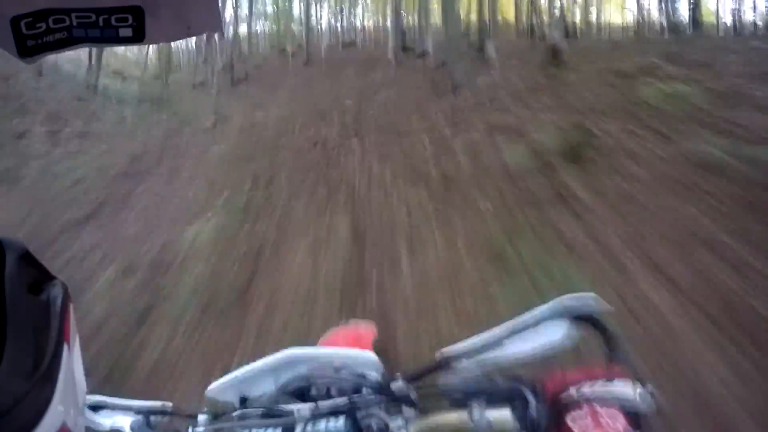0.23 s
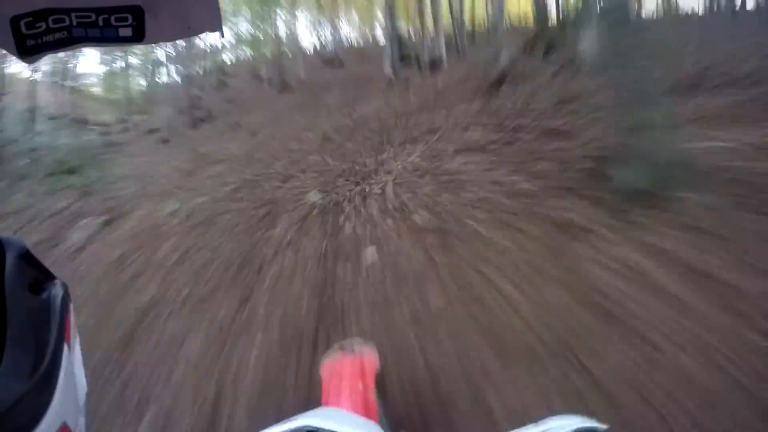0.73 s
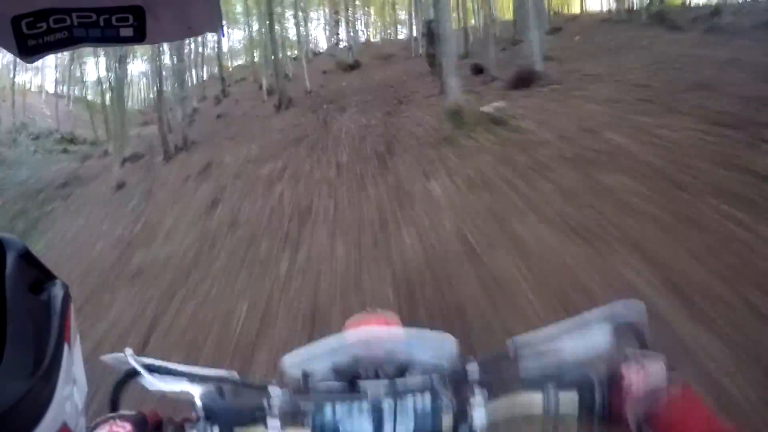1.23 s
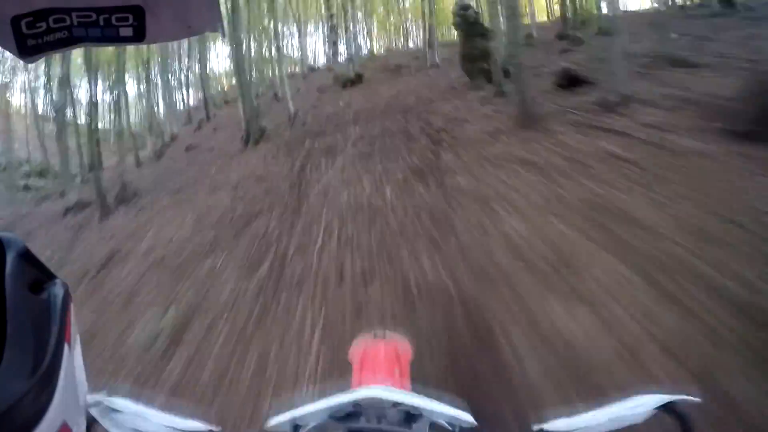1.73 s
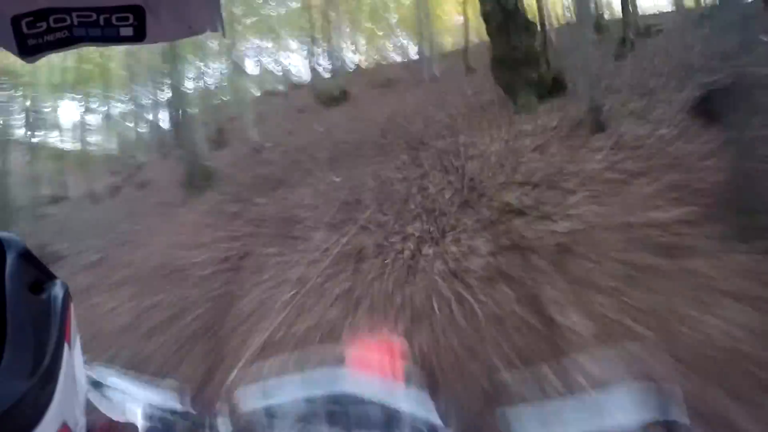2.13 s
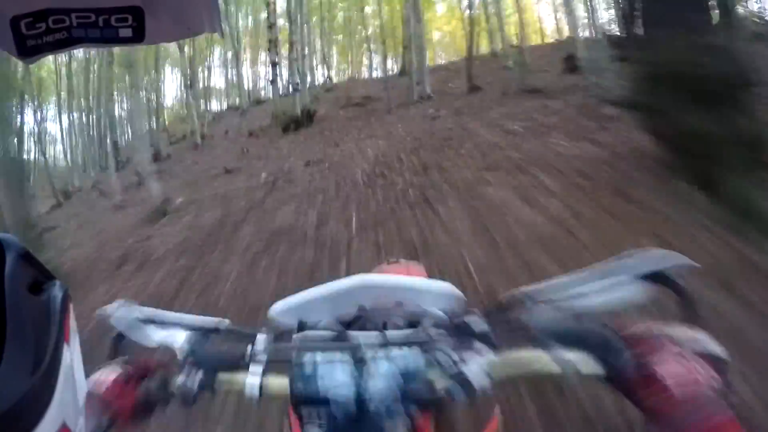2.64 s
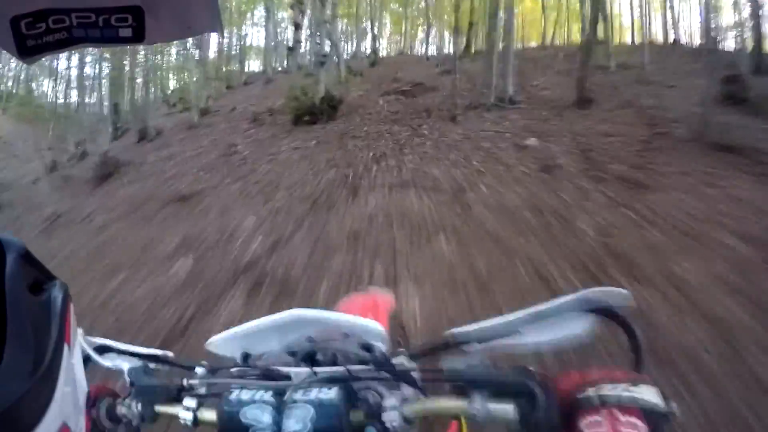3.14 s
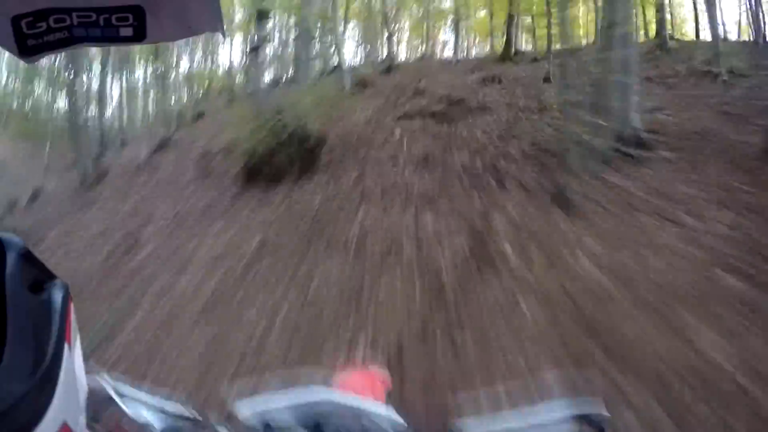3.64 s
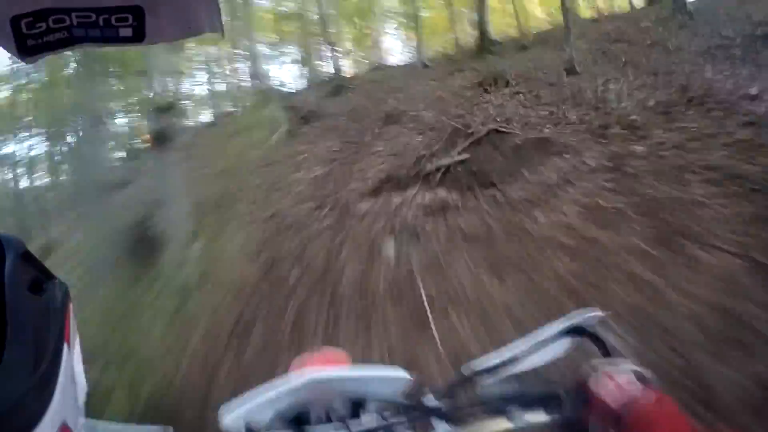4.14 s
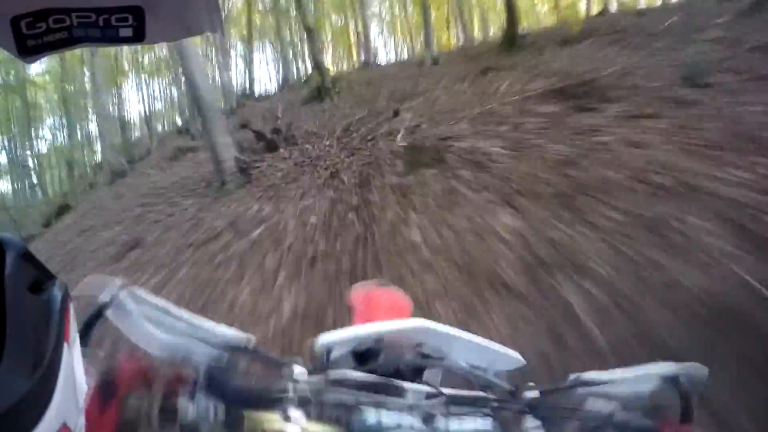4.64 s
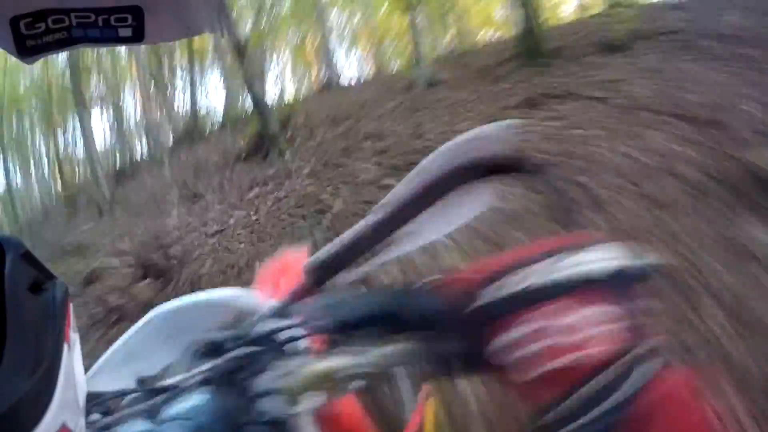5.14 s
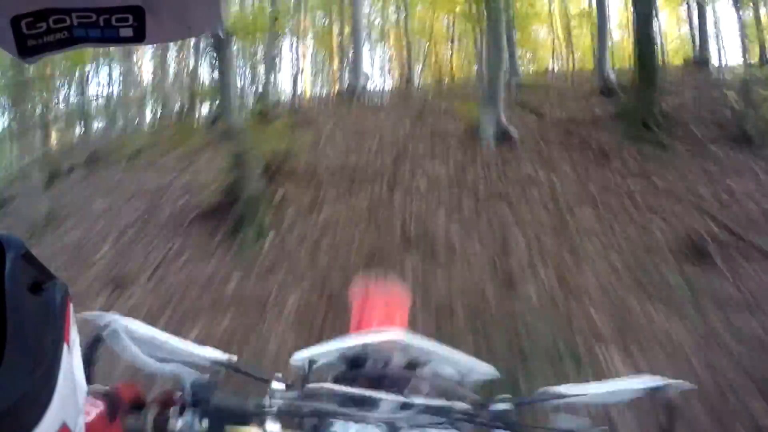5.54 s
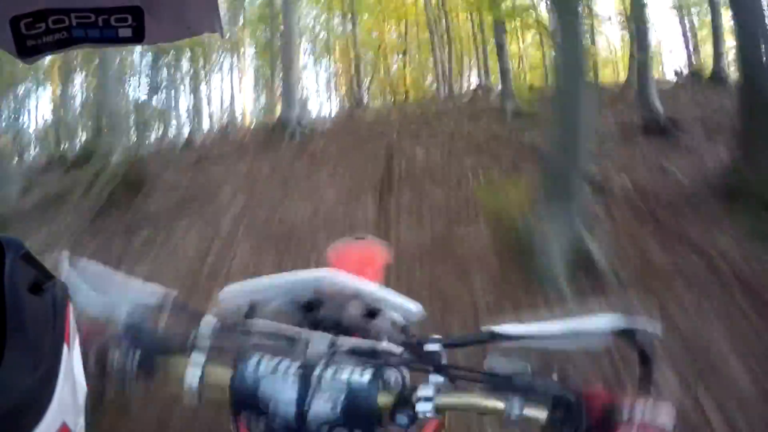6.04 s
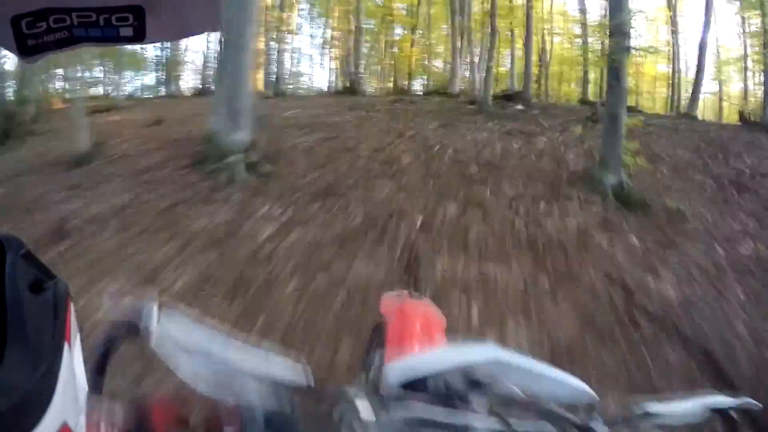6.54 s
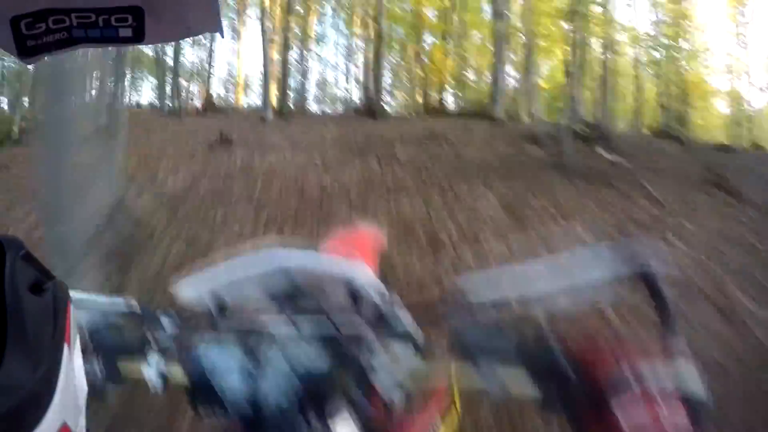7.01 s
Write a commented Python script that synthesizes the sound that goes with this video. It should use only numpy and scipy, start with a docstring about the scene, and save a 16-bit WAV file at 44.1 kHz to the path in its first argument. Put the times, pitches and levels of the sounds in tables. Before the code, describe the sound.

Close dirt bike engine surging in quick raspy throttle bursts, burbling between them, with tyre hiss, light wind and one hard knock.

```python
"""A single-cylinder dirt bike is ridden hard over a woodland floor, heard from the rider's helmet.
Each firing rings in the exhaust pipe. With the throttle open it also spits a burst of rasp;
with the throttle shut the engine burbles and pops. Chain and tyres hiss underneath, the bike
knocks over bumps (one hard, three faint), and air buffets the microphone."""
import sys
import numpy as np
from scipy import signal
from scipy.fft import rfft, irfft
from scipy.io import wavfile
from scipy.ndimage import uniform_filter1d

SR = 44100
rng = np.random.default_rng(int(sys.argv[2]) if len(sys.argv) > 2 else 0)


def wav_record(signal):
    """Record a signal, one row per channel, as 16-bit PCM in the file named by sys.argv[1]."""
    frames = np.transpose(np.atleast_2d(signal))
    bounded = np.clip(frames, -1, 1)
    # unit amplitude maps onto the largest positive 16-bit level
    quanta = np.round(bounded * 32767).astype(np.int16)
    wavfile.write(sys.argv[1], SR, quanta)


N = 320607
TIME = np.arange(N) / SR

# The tone of one strong firing. Each row: frequency in Hz, relative level in dB.
FIRING_TONE = [(20, -48), (45, -8), (75, 2.5), (105, -7.5), (135, 3.5), (170, 6), (205, 10.5), (275, 9.5),
               (370, 2), (450, 2), (550, 2), (640, 8), (750, -18), (1100, -17), (1500, -23.5),
               (4000, -75.5)]


def exhaust(cycles, rate, load, pipe_hz, echo, tilt_db, knee_hz=160, chamber_s=.0031):
    """Firing pulses echo in the pipe, which lifts the harmonics near its tuning and its multiples."""
    # The tone of a firing on a shut throttle. Each row: frequency in Hz, relative level in dB.
    coasting_tone = [(20, -23.5), (45, -17.5), (90, 4), (130, -2.5), (165, 8), (210, -2), (300, 6.5),
                     (370, 1), (440, 4), (590, 5.5), (720, -10), (1100, -25), (4000, -76)]
    # What an open throttle adds. Each row: harmonic (multiple of the firing rate), boost in dB.
    pulling_boost = [(1, 5.5), (2, 7), (3, 5.5), (4, 6), (5, 4.5), (6, 10.5), (7, 3.5), (8, 8.5),
                     (20, -8.5)]
    pulses, power = np.zeros(N), np.zeros(N)
    crank, wave = np.exp(2j * np.pi * cycles), np.ones(N, complex)
    pipe_delay, returned = np.exp(-2j * np.pi * rate / pipe_hz), echo
    for harmonic in range(1, 21):
        hz = harmonic * rate
        wave = wave * crank  # steps up to the next harmonic
        returned = returned * pipe_delay
        open_db = level_at(FIRING_TONE, hz) + np.interp(harmonic, *np.transpose(pulling_boost))
        tone_db = load * open_db + (1 - load) * level_at(coasting_tone, hz)
        # a sharper release of gas brightens everything above the knee
        bright_db = tilt_db * np.log2(np.maximum(hz / knee_hz, 1))
        weight = gain_of(tone_db + sway(harmonic) + bright_db) / (1 - returned)
        # the silencer's chambers split each pulse into a short cluster of beats
        chambers = np.exp(1.25j * np.sin(2 * np.pi * hz * chamber_s))
        pulses += (weight * wave * chambers).real
        power += abs(weight) ** 2 / 2
    # firings are even under load and a little ragged on a shut throttle
    spread_db = .4 * load + 1.2 * (1 - load)
    pulses *= gain_of(spread_db * per_firing(cycles + 0.23)) / np.sqrt(power)
    # swirling gas rushes out with the pulses
    gas = normalised(colour(rng.standard_normal(N), coasting_tone))
    gas_db = -32 * load - 19 * (1 - load)
    return pulses + gas * gain_of(gas_db)


def throttle():
    """Each twist rolls on, holds and rolls off, lifting the levels and setting the pipe's voice."""
    # Each row: opening time and easing-off time in seconds, roll-on and roll-off lengths in seconds,
    # engine level in dB, relative treble level in dB, pipe tuning in Hz, brightness in dB per octave.
    twists = [(-.1, 0.532, 0.11, 0.035, -9.5, -30.5, 281, -5.5),
              (.15, 0.278, 0.057, 0.2, -12, -27.5, 282, -6),
              (0.669, .955, 0.13, 0.051, -10.5, -28.6, 264, -4.5),
              (1.61, 1.80, 0.021, .05, -14.5, -36, 285, 7),
              (1.763, 1.982, 0.057, 0.051, -9.5, -27, 294.5, -3.5),
              (1.9, 2.564, .1, 0.14, -10, -29.5, 259.9, -3), (2.4, 3.34, .17, 0.039, -10, -27.5, 248.2, -4),
              (3.532, 3.691, 0.068, 0.076, -9, -27.5, 270, -5.5),
              (3.897, 4.0, 0.032, 0.036, -8, -28, 288, -5),
              (4.162, 4.371, .022, 0.36, -8.5, -30.5, 269.4, -2.5),
              (4.301, 4.712, 0.34, 0.034, -10.5, -29, 272.5, -1.5),
              (4.888, 5.02, 0.065, .2, -9.5, -24, 253, -2.5),
              (4.946, 5.24, 0.088, 0.052, -10.5, -26.5, 263, -4.5),
              (5.386, 6.043, .05, 0.066, -9.5, -31, 258.4, -4.5),
              (6.142, 6.464, 0.29, 0.33, -8.5, -29.5, 240.1, -0.5),
              (6.377, 6.8, 0.27, 0.26, -9, -27, 278.3, -8),
              (6.698, 7.167, 0.19, .04, -9.5, -28.5, 256.9, -3.5)]
    # Throttle shut. Each row: time in seconds, engine level in dB, relative treble level in dB.
    coasting_levels = [(.62, -24.5, -42), (1.05, -19.5, -40), (1.35, -18.5, -44), (1.52, -22, -43.5),
                       (3.45, -20, -37), (3.85, -18.5, -40.5), (4.08, -17.5, -36.5), (4.8, -21.5, -37.5),
                       (5.33, -20.5, -37), (6.14, -23.5, -39.5), (7.25, -19, -36.5)]
    coast_db, hiss_db = curves(coasting_levels)
    engine_db, treble_db = coast_db, hiss_db
    voice, total_grip = np.zeros((2, N)), 1e-9
    for opened, eased, on_s, off_s, pull_db, snarl_db, pipe_hz, tilt_db in twists:
        grip = np.interp(TIME, [opened, opened + on_s, eased, eased + off_s], [0, 1, 1, 0])
        engine_db = np.maximum(engine_db, coast_db + grip * (pull_db - coast_db))
        treble_db = np.maximum(treble_db, hiss_db + grip * (snarl_db - hiss_db))
        voice += np.outer([pipe_hz, tilt_db], grip)
        total_grip += grip
    open_hz, open_tilt_db = voice / total_grip  # overlapping twists blend their voices
    return engine_db, treble_db, open_hz, open_tilt_db


def pipe(load, rate, open_hz, open_tilt_db, shut_hz=280, coast_rate=80):
    """Under load the pipe rings harder and takes on the tuning and brightness of the twist."""
    pipe_hz = load * open_hz + (1 - load) * shut_hz
    echo = load * 0.53 + (1 - load) * 0.19  # share of each pulse that comes back
    shut_tilt_db = -4.5 + 8 * np.log2(rate / coast_rate)  # slow firings are duller
    tilt_db = load * open_tilt_db + (1 - load) * shut_tilt_db
    return pipe_hz, echo, tilt_db


def sway(harmonic, step_s=.09):
    """A harmonic swells and fades by a few dB as the rider is thrown about."""
    # Each row: harmonic number, size of its random swing in dB.
    swings = [(1, -0.5), (2, 2.1), (3, -1.06), (4, 6), (5, 4.5), (6, 4.5), (7, 3.5), (10, 4)]
    times = np.arange(0, N / SR + step_s, step_s)
    drift = np.interp(TIME, times, rng.standard_normal(len(times)))
    return np.interp(harmonic, *np.transpose(swings)) * drift


def throb(cycles):
    """A deep throb at the firing rate swells as the engine pulls away from low revs."""
    # Each row: time in seconds, level in dB.
    levels = [(1.55, -50), (1.65, -27), (1.76, -17.5), (1.84, -17), (1.95, -33), (2.08, -57)]
    return gain_of(curves(levels)[0]) * normalised(np.cos(2 * np.pi * cycles))


def rasp(cycles, load, split_hz=1700):
    """Each firing spits when the engine pulls: a repeating snarl, with fresh spray in the treble."""
    # Each row: frequency in Hz, relative level in dB.
    rasp_tone = [(500, -27), (900, -9), (1500, -4.5), (1950, -8), (2400, -5.5), (2950, -4), (3550, -10.5),
                 (4200, -12), (5300, -14.5), (6200, -21), (7400, -28), (9500, -27.5), (11500, -34.5),
                 (15000, -35)]
    spits = burst(cycles, at=.6, width=.115) * gain_of(.9 * per_firing(cycles))
    shape = irfft(np.r_[0, np.exp(2j * np.pi * rng.random(32))], 1024)  # one cycle of 32 harmonics
    repeating = shape[(cycles % 1 * len(shape)).astype(int)]
    snarl = .9 * normalised(colour(spits * repeating, rasp_tone))
    spray = colour(spits * gain_of(2.0 * wander(900)) * rng.standard_normal(N), rasp_tone)
    high_pass = signal.butter(2, split_hz, "high", fs=SR, output="sos")
    spray = normalised(signal.sosfilt(high_pass, spray))
    return load * gain_of(-5.5) * (spray + snarl)


def pops(pipe_hz=270, echo=0.35):
    """Lone firings on a nearly shut throttle ring down the pipe."""
    # Each row: start in seconds, peak level in dB.
    firings = [(0.71, -9), (1.581, -6.5), (1.629, -6), (3.916, -4.5), (4.829, -7.5), (4.868, -8),
               (5.405, -3.5), (6.203, -6)]
    out = np.zeros(N)
    pipe_delay = np.exp(-2j * np.pi * np.fft.rfftfreq(2600, 1 / SR) / pipe_hz)
    ring = colour(irfft(1 / (1 - echo * pipe_delay)), FIRING_TONE)
    for start, db in firings:
        add(out, start, gain_of(db) * ring / abs(ring).max())
    return out


def knocks(attack_s=0.00021, clack_s=0.0038, thud_hz=62, thud_s=0.01):
    """Each bump makes a hard clack over a low thud of the frame."""
    # Each row: start in seconds, clack peak in dB, level in dB that the thud dies away from.
    bumps = [(1.311, -32, -30), (1.581, -28, -26), (2.415, -40, -20), (4.358, -11.5, -8)]
    # Each row: frequency in Hz, relative level in dB.
    clack_tone = [(300, -27), (1200, 11.5), (2200, -16), (3400, 7), (5500, -3), (9000, -14.5), (15000, -10)]
    out, t = np.zeros(N), np.arange(6000) / SR
    envelope = np.exp(-t / clack_s) * (1 - np.exp(-t / attack_s))
    thud = np.sin(2 * np.pi * thud_hz * t) * np.exp(-t / thud_s)
    for start, clack_db, thud_db in bumps:
        clack = colour(rng.standard_normal(len(t)) * envelope, clack_tone)
        add(out, start, gain_of(clack_db) * clack / abs(clack).max() + gain_of(thud_db) * thud)
    return out


def chain_and_tyres(load, ticks_per_s=60, grit_db=-13):
    """Chain, gears and tyres in dry leaves hiss, with a metallic ring and small ticks of grit."""
    # Each row: frequency in Hz, relative level in dB.
    hiss_tone = [(400, -3), (700, -6), (1100, -11.5), (1700, -16.5), (2400, -13.5), (2950, -11.5),
                 (3500, -18.5), (3900, -18.5), (4250, -14.5), (4700, -20.5), (6000, -24), (7500, -32.5),
                 (10500, -41), (15000, -45.5)]
    hiss = normalised(colour(rng.standard_normal(N) * gain_of(0.27 * wander(52)), hiss_tone))
    ticks = (rng.random(N) < ticks_per_s / SR) * rng.standard_normal(N)
    grit = gain_of(grit_db) * normalised(colour(ticks, hiss_tone))
    return gain_of(5.5 - 8.5 * load) * (hiss + grit)  # gives way to the rasp under load


def wind(boost_db=8.5):
    """Air buffets the microphone with a lumpy, low rumble."""
    # Each row: time in seconds, level in dB before the boost.
    levels = [(0.0, -47), (0.3, -44), (0.67, -34.5), (1.62, -30), (1.92, -40), (2.15, -50), (2.31, -43),
              (3.22, -54), (3.83, -35.5), (4.68, -51), (4.96, -44), (5.93, -67), (6.26, -51), (6.82, -68),
              (7.27, -50)]
    # Each row: frequency in Hz, relative level in dB.
    gust_tone = [(10, -2.5), (25, -20), (50, -10), (90, -12.5), (200, -21), (600, -23.5), (2000, -75.5)]
    gusts = rng.standard_normal(N) * gain_of(2 * wander(31))
    return gain_of(curves(levels)[0] + boost_db) * normalised(colour(gusts, gust_tone))


def gain_of(db):
    """Turns decibels into a number to multiply by."""
    return 10 ** (np.asarray(db) / 20)


def normalised(x):
    """Scales a signal to an average power of 1."""
    return x / np.sqrt(np.mean(x ** 2) + 1e-20)


def level_at(tone, hz):
    """Looks up a tone table's level in dB at any frequency."""
    freqs, db = np.transpose(tone)
    return np.interp(np.log(hz + 1), np.log(freqs + 1), db)


def curves(table):
    """Joins a table's timed rows with straight lines, giving one curve for each value column."""
    times, *columns = np.transpose(table)
    return [np.interp(TIME, times, column) for column in columns]


def add(mix, start_s, sound):
    """Lays a sound into the mix at the given time."""
    part = mix[round(start_s * SR):][:len(sound)]
    part += sound[:len(part)]


def colour(x, tone, size=8192):
    """Filters a sound to the given tone; the filter rings only after each hit, never before."""
    hz = abs(np.fft.fftfreq(size, 1 / SR))
    log_gain = np.log(gain_of(np.maximum(level_at(tone, hz), -100)))
    response = np.exp(np.conj(signal.hilbert(log_gain)))
    taps = np.fft.ifft(response).real[:size // 2]
    return signal.oaconvolve(x, taps)[:len(x)]


def wander(hz):
    """A smooth random wobble, up to about the given rate."""
    freqs = np.fft.rfftfreq(N, 1 / SR)
    return normalised(irfft(rfft(rng.standard_normal(N)) / (1 + (freqs / hz) ** 4), N))


def per_firing(cycles, size=1024):
    """One random value for each firing, held through its cycle."""
    held = np.clip(rng.standard_normal(size), -2, 2)[cycles.astype(int) % size]
    return uniform_filter1d(held, size=40)


def burst(cycles, at, width):
    """A smooth swell once a cycle; its place and width are fractions of the cycle."""
    return normalised(np.exp((np.cos(2 * np.pi * (cycles - at)) - 1) / (2 * np.pi * width) ** 2))


def scene(slip=0.00814, slip_hz=13.07):
    """Engine speed and throttle drive the bike's voice; pops, knocks and wind join it."""
    # Each row: time in seconds, firings per second.
    engine_speed = [(0.0, 95.7), (0.12, 101), (0.26, 105.4), (0.34, 94), (0.47, 95.8), (0.53, 107),
                    (0.55, 98), (0.75, 70.6), (0.83, 76.6), (0.97, 83), (1.07, 55.3), (1.5, 41.2),
                    (1.62, 42.7), (1.7, 58.3), (1.78, 65.2), (2.06, 87.7), (2.24, 87.8), (2.29, 95),
                    (2.47, 89), (2.67, 78.5), (2.81, 96), (2.93, 82.3), (3.0, 96.4), (3.12, 81.5),
                    (3.22, 86.8), (3.34, 96), (3.52, 77.4), (3.56, 65.5), (3.73, 76.3), (3.81, 49.3),
                    (3.91, 43), (3.99, 78.7), (4.01, 85), (4.09, 76), (4.19, 65.4), (4.29, 93), (4.41, 95),
                    (4.61, 87.4), (4.7, 100), (4.8, 73), (4.86, 70), (5.0, 100.3), (5.12, 83), (5.22, 87.3),
                    (5.39, 69.7), (5.53, 107), (5.57, 110), (5.67, 89), (5.73, 98.0), (5.83, 89), (6.1, 86),
                    (6.15, 77), (6.28, 81), (6.4, 93.4), (6.48, 79), (6.64, 89), (6.88, 94.3), (7.03, 71),
                    (7.19, 84.6), (7.27, 72.6)]
    rate = curves(engine_speed)[0] * (1 + slip * wander(slip_hz))  # the rear wheel slips and grips
    engine_db, treble_db, open_hz, open_tilt_db = throttle()
    load = np.clip((engine_db + 15.5) / 7, 0, 1)  # 0 = throttle shut, 1 = pulling
    cycles = np.cumsum(rate) / SR + .0035 * wander(35)  # counts firings, each a bit early or late
    pipe_hz, echo, tilt_db = pipe(load, rate, open_hz, open_tilt_db)
    engine = gain_of(engine_db) * exhaust(cycles, rate, load, pipe_hz, echo, tilt_db)
    treble = gain_of(treble_db) * (rasp(cycles, load) + chain_and_tyres(load))
    return (engine + throb(cycles) + treble + pops() + knocks() + wind())[None]


def record(dry):
    """Rounds off the loudest peaks, then cuts the treble above 15300 Hz."""
    rounded = dry / (1 + (dry / .98) ** 10) ** (1 / 10)
    low_pass = signal.firwin(511, 15300, window=("kaiser", 9), fs=SR)
    return signal.oaconvolve(rounded, low_pass[None], "same")


dry = scene()
out = record(dry)
wav_record(out)
```